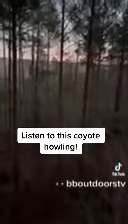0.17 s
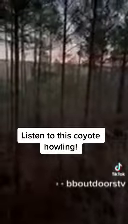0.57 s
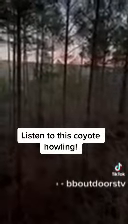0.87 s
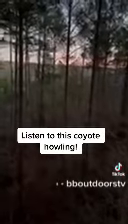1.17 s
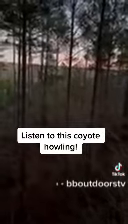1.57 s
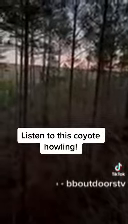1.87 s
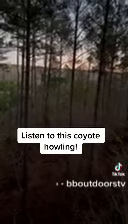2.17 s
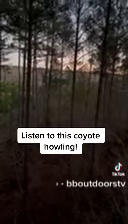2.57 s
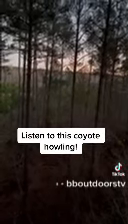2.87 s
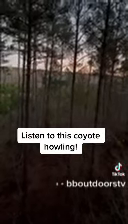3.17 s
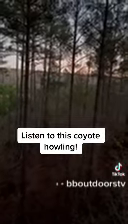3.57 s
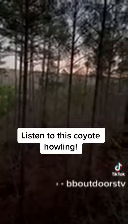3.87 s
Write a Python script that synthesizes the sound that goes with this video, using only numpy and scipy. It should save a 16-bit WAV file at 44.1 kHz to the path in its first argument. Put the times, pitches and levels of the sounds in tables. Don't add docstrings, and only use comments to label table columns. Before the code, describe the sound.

Far coyote howl drops from thin high tone to fuller low one, with faint bird chirps.

```python
import sys
import numpy as np
from scipy import signal
from scipy.fft import rfft, irfft
from scipy.io import wavfile
from scipy.ndimage import uniform_filter1d, map_coordinates

SR = 44100
rng = np.random.default_rng(int(sys.argv[2]) if len(sys.argv) > 2 else 0)


def ratio_of_db(decibels):
    return 10 ** (np.asarray(decibels, float) / 20)


def digitize_waveform(pressure):
    field = np.atleast_2d(pressure).T
    bounded = np.clip(field, -1, 1)
    quanta = np.round(bounded * 32767).astype(np.int16)
    wavfile.write(sys.argv[1], SR, quanta)


N = 176400

# t/s, f/Hz
HEAD_PITCH = [
    (0.0, 739),
    (0.012, 756.8),
    (0.17, 782.7),
    (0.252, 756.5),
    (0.35, 776.3),
    (0.452, 752.2),
    (0.752, 728.7),
    (1.4, 752.6),
    (1.535, 703),
]
# t/s, f/Hz
CHEST_PITCH = [
    (1.55, 640.4),
    (1.74, 623.5),
    (2.4, 584.3),
    (3.0, 523.4),
    (3.3, 477),
    (3.45, 476.7),
    (3.65, 485.8),
    (4.0, 470.6),
]
HEAD_FOLDS = [-16.5, 2, -10, -50.5, -25, -21.5]
CHEST_FOLDS = [-3, -1.5, -14, -23.5, -46.5, -50]
# f/Hz, level/dB
THROAT_TONE = [(450, -2), (620, 0.5), (950, 0.5), (1250, -5), (1550, -1.5), (1900, 5), (2220, 8),
               (2440, -6.5)]
# t/s, level/dB, fullness of the fundamental/dB, mouth opening/dB
HOWL_EFFORT = [(0, -49, 2, -2), (.3, -50, -3.5, -3.5), (.5, -50.5, -5, 3.5), (.65, -45.5, -12.5, 0.5),
               (.85, -48.5, -12, 2), (1.05, -47.5, 1.5, -4), (1.4, -51.5, 4, 5.5), (1.53, -47.5, 4, 1),
               (1.7, -41, 3, -4), (2.05, -46.5, 2, -1), (2.3, -48, 6, -1), (2.5, -49, 2, -6),
               (2.8, -52.5, -1, 2), (3.0, -53, -1, -1.5), (3.12, -50.5, -6, -6), (3.3, -57.5, 0.5, -4.5),
               (3.5, -53.5, -4.5, -11), (4, -64.5, -5.5, 4)]
MOUTH_SHARE = [0.4, 0.33, 0.94, 1.44, 0.034, 0.3]
FADING_SHARE = [1.96, 0.66, 0.86, 1.2, 0.61, 0.52]
# start and end t/s, then loss of overtones 1 to 6 level/dB
GIVE_OUT_TIME = [.42, .54]
GIVE_OUT_LOSS = [0, 0, 0, 0, -8, -24]
# f/Hz, t60/s
WOOD_DECAY = [(400, 3.1), (1500, 2.46), (2500, 2), (4000, 1.1), (7000, 1.1)]
# f/Hz, level per Hz/dB
RUMBLE_TONE = [(12, -52.5), (20, -15), (50, 2), (70, 4.5), (172, -8), (380, -18), (433, -23), (450, -11),
               (580, -34), (990, -120)]
# t/s, level/dB
RUMBLE_SWELL = [(0, -74), (1.2, -74.5), (1.6, -69), (1.9, -70.5), (2.15, -75.5), (3.2, -75), (3.6, -74.5),
                (3.8, -75), (4, -74)]
# f/Hz, level/dB
AIR_TONE = [(300, -4.5), (900, 2), (2500, -17), (4000, -14.5), (7800, -19.5), (8600, -22.5), (11400, -25.5),
            (13500, -34)]
# t/s, level/dB
CHIP_NOTES = [
    (.032, -62.5),
    (1.612, -71.5),
    (2.12, -68),
    (2.746, -64),
    (3.258, -60.5),
    (3.794, -57.5),
]
# t/s, length/s, f/Hz, level/dB
BUZZ_NOTES = [
    (0.422, 0.052, 7160, -72.5),
    (0.778, .095, 7180, -76),
    (2.577, 0.092, 7420, -70),
    (2.96, 0.042, 7600, -82.5),
]
# t/s, length/s, f/Hz, level/dB
CHIRP_NOTES = [
    (0.294, .035, 5230, -86.5),
    (0.709, 0.049, 5131, -92),
    (.93, 0.045, 3750, -89.5),
    (2.449, 0.026, 3650, -78),
    (3.915, .036, 3620, -79.5),
]
# t/s, length/s, level/dB
TWIG_RUSTLES = [
    (2.357, .042, -81),
    (3.221, .005, -82),
]
# f/Hz, level/dB
TWIG_TONE = [(2600, -32), (3000, -1), (4300, 0), (4800, -5.5), (7500, -11), (8000, -24)]
# f/Hz, level under a loud tone/dB
MASK_THRESHOLD = [(400, -42), (900, -23), (1300, -33.5), (1850, -53.5), (2400, -38), (3000, -33.5),
                  (4500, -44.5)]
# from f/Hz, to f/Hz
TREBLE_EDGES = [(8300, 8800), (11400, 13750)]


def unit(x):
    return x / np.sqrt(np.mean(x ** 2) + 1e-20)


def along(points, hz):
    f, v = np.transpose(points)
    return np.interp(np.log(hz + 1), np.log(f + 1), v)


def wobble(rate, size):
    return map_coordinates(rng.standard_normal(1500), [np.arange(size) * rate / SR], mode="mirror")


def noise(gain):
    return unit(irfft(rfft(rng.standard_normal(N)) * gain(np.fft.rfftfreq(N, 1 / SR)), N))


def smooth_field(shape, bins, frames):
    field = uniform_filter1d(rng.standard_normal(shape), size=bins, axis=0)
    return uniform_filter1d(field, size=frames, axis=1)


def patchy(x, depth_db):
    z = signal.stft(x, nperseg=512)[2]
    gain = ratio_of_db(depth_db * unit(smooth_field(z.shape, 4, 40)))
    return signal.istft(z * gain, nperseg=512)[1][:N]


def scatter(x, far_db, near_db, near_t60, hold_s):
    hz, t, z = signal.stft(rng.standard_normal(3 * SR), SR, nperseg=256)
    far = signal.istft(z * ratio_of_db(-60 * t / along(WOOD_DECAY, hz)[:, None]), SR, nperseg=256)[1]
    t = np.arange(len(far)) / SR
    near = rng.standard_normal(len(far)) * ratio_of_db(-60 * t / near_t60 - 4.2 * (t > hold_s))
    tail = ratio_of_db(far_db) * far / np.linalg.norm(far) + ratio_of_db(near_db) * near / np.linalg.norm(near)
    return x + signal.fftconvolve(np.pad(x, (100, 0)), tail)[:len(x)]


def coyote():
    lead = int(1.5 * SR)
    t = np.arange(-lead, N) / SR
    size = len(t)
    hz = np.interp(t, *np.transpose(list(HEAD_PITCH) + list(CHEST_PITCH)))
    hz = uniform_filter1d(hz, size=500) * (1 + 0.002 * wobble(14, size))

    s, *columns = np.transpose(HOWL_EFFORT)
    level_db, full_db, mouth_db = [np.interp(t, s, c) for c in columns]
    chest = np.interp(t, [HEAD_PITCH[-1][0], CHEST_PITCH[0][0]], [0, 1])
    k = np.arange(1, 7)[:, None]

    share_db = np.outer(HEAD_FOLDS, 1 - chest) + np.outer(CHEST_FOLDS, chest)
    share_db = share_db + along(THROAT_TONE, k * hz) + np.outer(MOUTH_SHARE, mouth_db)
    share_db = share_db + (k == 1) * full_db
    share_db = share_db + np.outer(GIVE_OUT_LOSS, np.interp(t, GIVE_OUT_TIME, [0, 1]))
    share = ratio_of_db(share_db)
    share = share / np.sqrt(np.sum(share ** 2, 0) / 2)

    flutter_db, flutter_rate = 1.3, 17
    breath_db, breath_rate = -21.5, 90
    fade = ratio_of_db([flutter_db * part * wobble(flutter_rate, size) for part in FADING_SHARE])
    fade = fade + ratio_of_db(breath_db) * np.array([wobble(breath_rate, size) for _ in k])

    overtones = np.sin(k * 2 * np.pi * np.cumsum(hz) / SR)
    voice = ratio_of_db(level_db) * np.sum(share * fade * overtones, 0)
    return scatter(voice, far_db=-13.5, near_db=-9, near_t60=0.35, hold_s=0.45)[lead:]


def dusk():
    mic_low_hz = 36.5
    s, db = np.transpose(RUMBLE_SWELL)
    swell_db = np.interp(np.arange(N) / SR, s, db) + 0.8 * wobble(5, N)
    rumble = noise(lambda f: ratio_of_db(along(RUMBLE_TONE, f)) * f ** 2 / (f ** 2 + mic_low_hz ** 2))
    air = noise(lambda f: ratio_of_db(along(AIR_TONE, f)) * (f > 300) * (f < 13750))
    air = ratio_of_db(-75 + 0.39 * wobble(7.5, N)) * air
    return ratio_of_db(swell_db) * rumble + patchy(air, depth_db=1.4)


def whine():
    t = np.arange(N) / SR
    level = ratio_of_db(-105 + 1.5 * wobble(20, N)) * (t < 0.56)
    return level * np.sqrt(2) * np.sin(2 * np.pi * 13000 * t)


def add(x, s, hz, envelope):
    x[round(s * SR):][:len(hz)] += envelope * np.sin(2 * np.pi * np.cumsum(hz) / SR)


def add_chips(x):
    for s, db in CHIP_NOTES:
        u = np.linspace(0, 1, int(0.022 * SR))
        hz = np.interp(u, [0, 0.25, 0.61, 1], [7500, 7210, 5887, 7420])
        hz = hz + 150 * wobble(250, len(u))
        swell = np.sqrt(np.abs(np.sin(np.pi * u ** 0.7)))
        add(x, s, hz, ratio_of_db(db + 2.9 * wobble(200, len(u))) * swell)


def add_buzzes(x):
    swing_hz, rate_hz, fade_db = 775, 190, 7.5
    for s, length, hz, db in BUZZ_NOTES:
        u = np.linspace(0, 1, int(length * SR))
        phase = 2 * np.pi * rate_hz * length * u + 1.5 * wobble(90, len(u))
        warble = np.arcsin(np.sin(phase)) * 2 / np.pi
        edge = np.clip(np.minimum(u, 1 - u) * 25, 0, 1)
        level = ratio_of_db(db - fade_db * u + 2.6 * wobble(150, len(u)))
        add(x, s, hz + swing_hz * warble, level * edge)


def add_chirps(x):
    for s, length, hz, db in CHIRP_NOTES:
        u = np.linspace(0, 1, int(length * SR))
        arch = 0.19 * (np.sin(np.pi * u) - 0.6) + 0.071 * wobble(450, len(u))
        add(x, s, hz * (1 + arch), ratio_of_db(db) * np.sqrt(np.abs(np.sin(np.pi * u))))


def birds():
    high, low = np.zeros((2, N + SR))
    add_chips(high)
    add_buzzes(high)
    add_chirps(low)
    wet = scatter(high + low, far_db=-9.5, near_db=2.5, near_t60=0.22, hold_s=0.055)
    return (wet + ratio_of_db(-3) * low)[:N]


def twigs():
    t = np.arange(N) / SR
    envelope = np.zeros(N)
    for s, length, db in TWIG_RUSTLES:
        envelope += ratio_of_db(db) * np.clip(np.minimum(t - s, s + length - t) / 0.0015, 0, 1)
    return envelope * noise(lambda f: ratio_of_db(along(TWIG_TONE, f)) * (f > 2600) * (f < 8000))


def scene():
    return (coyote() + dusk() + whine() + birds() + twigs())[None]


def mask(x):
    up_db, down_db = 24, 59.5
    hz, _, z = signal.stft(x, SR, nperseg=2048, noverlap=1536)
    power = uniform_filter1d(uniform_filter1d(np.abs(z) ** 2, size=5, axis=0), size=3, axis=1)
    low = slice(15, 260)
    octaves = np.log2(hz[low, None] / hz[None, low])
    slope_db = np.where(octaves > 0, up_db, -down_db) * octaves
    spread = ratio_of_db(2 * (along(MASK_THRESHOLD, hz[low, None]) - slope_db))
    over = np.abs(power[low]) / (spread @ np.abs(power[low]) + 1e-30)
    over = over * ratio_of_db(2 * 5 * unit(smooth_field(over.shape, 5, 6)))
    keep = np.ones(z.shape)
    keep[low] = np.maximum(over ** 4 / (1 + over ** 4), ratio_of_db(-26.5))
    return signal.istft(z * keep, SR, nperseg=2048, noverlap=1536)[1][:N]


def treble(x):
    squeeze, shift_hz = 0.44, 6040
    f = np.fft.rfftfreq(N, 1 / SR)
    middle = irfft(rfft(x) * (f > 2680) * (f < 5370), N)
    loudness = uniform_filter1d(middle ** 2, size=900) / np.mean(middle ** 2)
    middle = middle * (loudness + 0.00045) ** (-squeeze / 2)
    carrier = np.exp(2j * np.pi * shift_hz * np.arange(N) / SR)
    moved = np.real(signal.hilbert(middle) * carrier)
    gap = (f > TREBLE_EDGES[0][1]) & (f < TREBLE_EDGES[1][0])
    return irfft(rfft(x) * ~gap, N) + ratio_of_db(-12) * moved


def band_limit(x):
    return signal.sosfilt(signal.butter(12, 13750, fs=SR, output="sos"), x)


def record(dry):
    hiss = ratio_of_db(-105) * rng.standard_normal(dry.shape)
    mix = treble(mask(dry[0]))[None] + hiss
    return band_limit(mix)


dry = scene()
out = record(dry)
digitize_waveform(out)
```